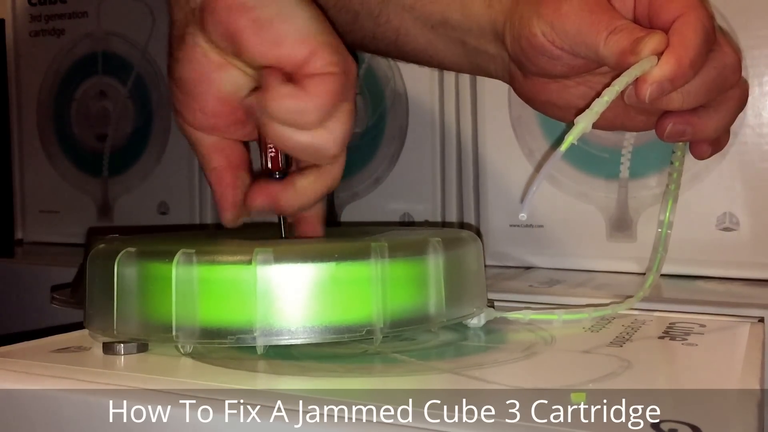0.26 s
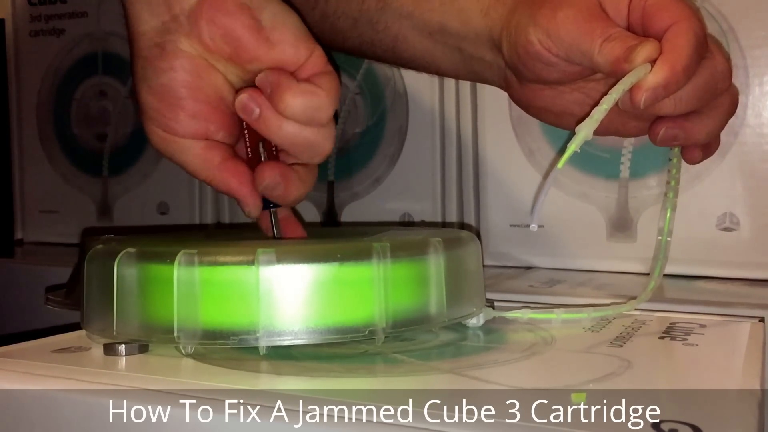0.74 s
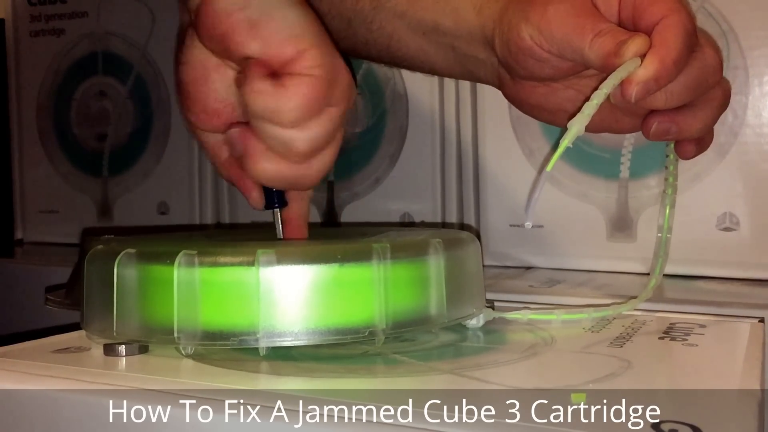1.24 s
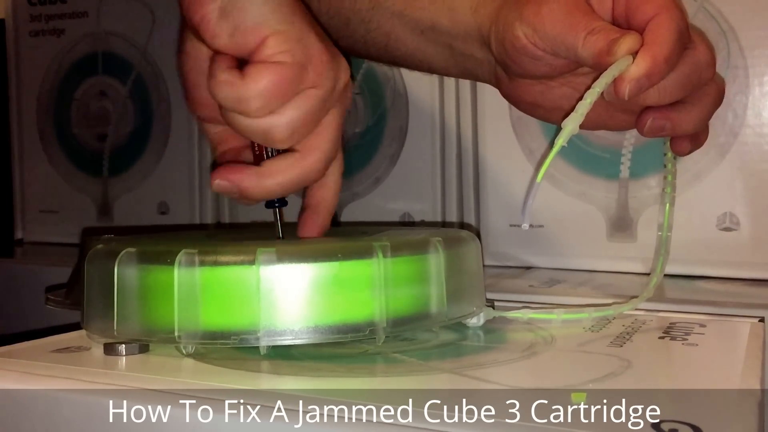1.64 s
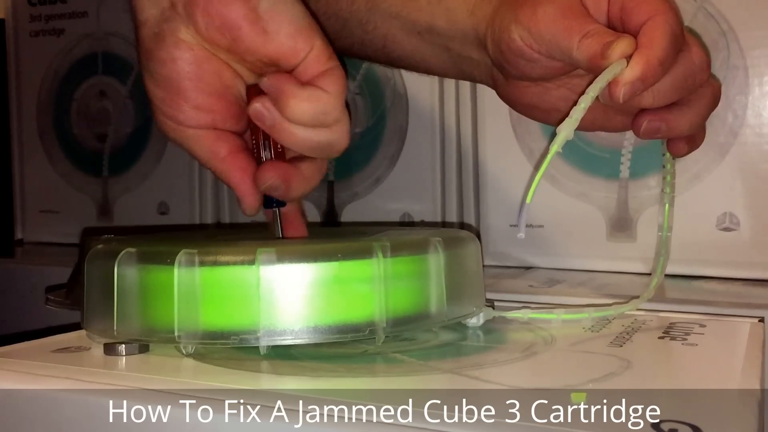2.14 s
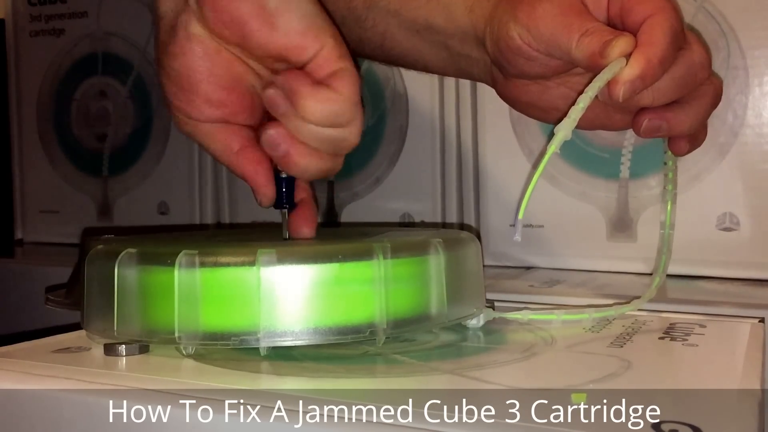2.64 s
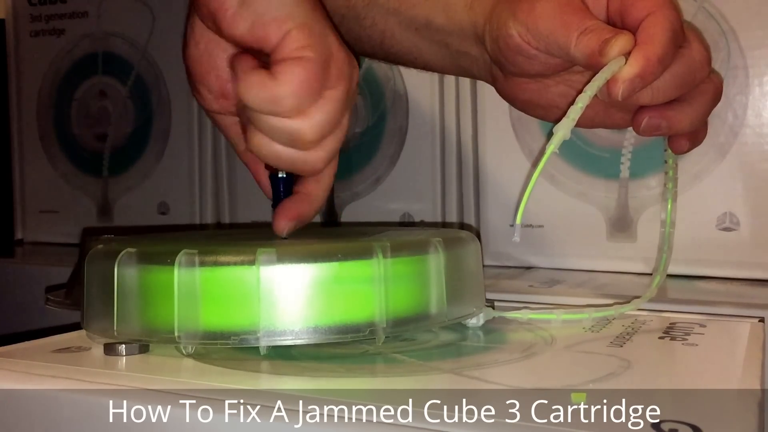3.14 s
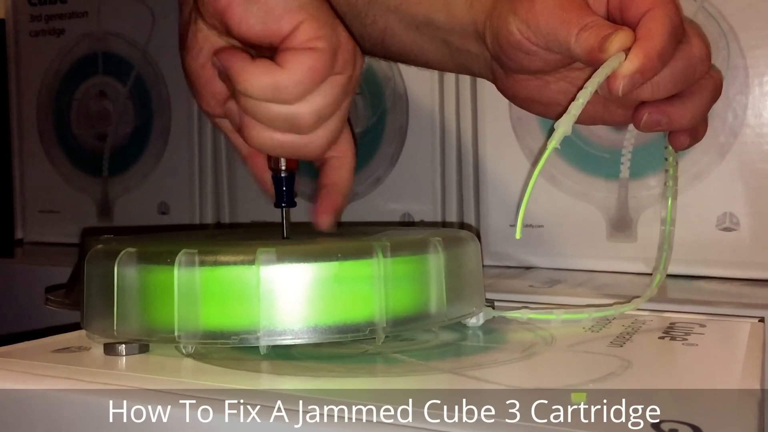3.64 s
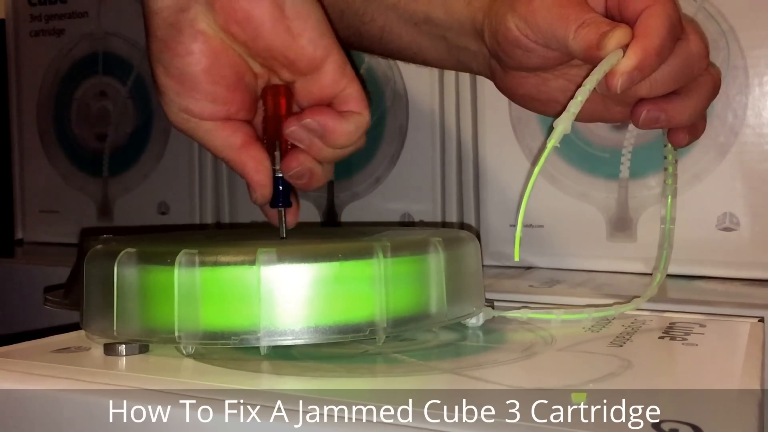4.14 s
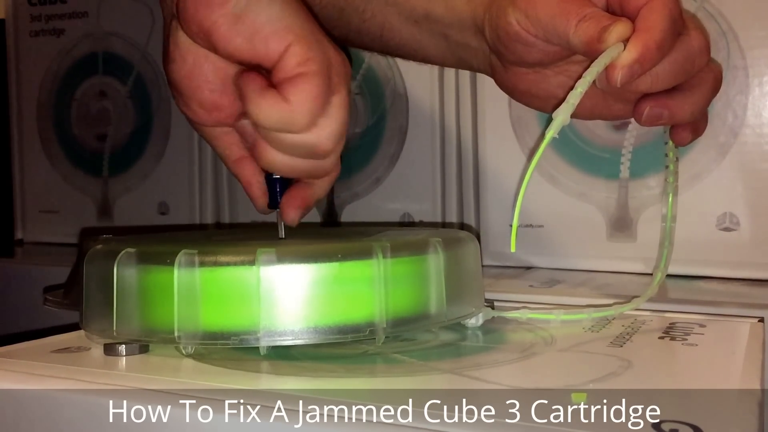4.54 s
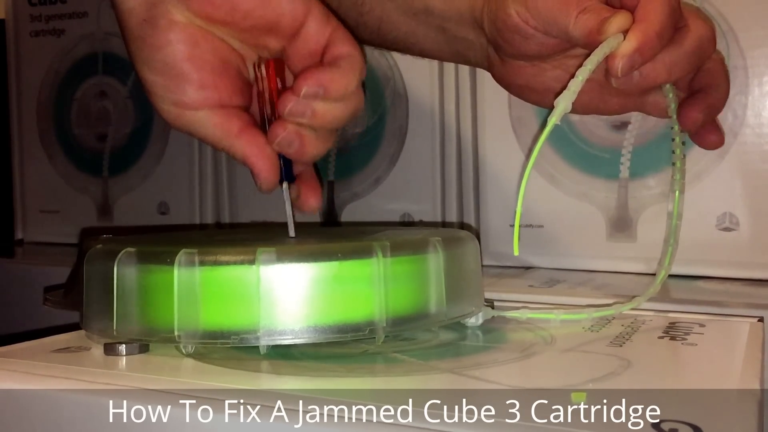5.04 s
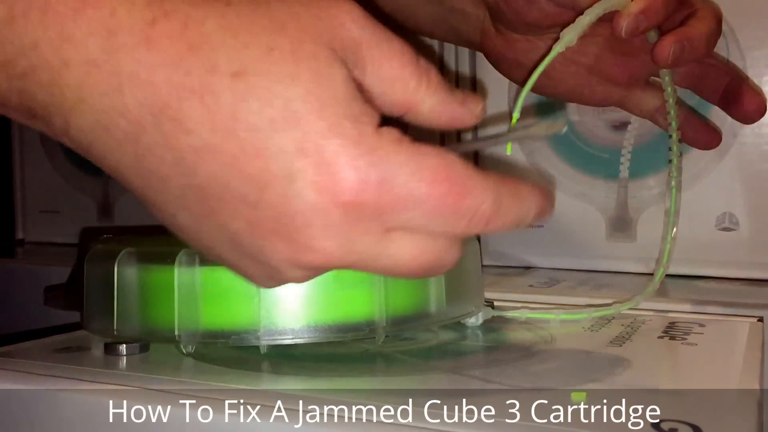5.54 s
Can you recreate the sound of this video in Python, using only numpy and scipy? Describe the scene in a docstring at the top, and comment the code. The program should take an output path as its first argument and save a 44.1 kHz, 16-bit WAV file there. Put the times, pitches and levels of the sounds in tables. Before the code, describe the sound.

Irregular plastic clicks and faint ratcheting scrapes in a quiet room, broken early by a sharp crack with a low thump.

```python
"""On a printer's bed in a small room, a small screwdriver turns the feed gear of a plastic filament cartridge by hand.
Each twist grinds and ticks the gear teeth: random slips and short blows excite decaying modes of the plastic.
Between twists the blade knocks in its socket. Once the gear slips with a loud snap that jolts the cartridge on the
bed; at the end the blade chatters out of the socket in squeaking slips. Room air and mains hum lie underneath."""
import sys
import numpy as np
from scipy import signal
from scipy.fft import rfft, irfft
from scipy.io import wavfile

SR = 44100
rng = np.random.default_rng(int(sys.argv[2]) if len(sys.argv) > 2 else 0)


def output_pcm(signal):
    """Save a mono or channel-first signal as 16-bit PCM at the path in sys.argv[1].

    Samples are clipped to [-1, 1] before scaling.
    """
    pcm = np.clip(np.atleast_2d(signal).T, -1, 1) * 32767
    wavfile.write(sys.argv[1], SR, np.round(pcm).astype(np.int16))


N = 255382
AGE = np.arange(6000) / SR  # time since a blow, s


def undb(db):
    """Decibels to gain."""
    return 10 ** (np.asarray(db) / 20)


def fade(t60, t=AGE):
    """Exponential decay by 60 dB in t60 seconds."""
    return np.exp(-np.log(1000) * t / t60)


def unit(x):
    """Scale a short sound to the energy of 10 ms at full level."""
    return x / np.sqrt(np.sum(x ** 2) / (SR / 100) + 1e-18)


def add(out, s, x):
    """Mix x into out from time s."""
    i = max(int(s * SR), 0)
    out[i:i + len(x)] += x[:len(out) - i]


def cut(x, hz, kind, order=3):
    """Butterworth filter."""
    return signal.sosfilt(signal.butter(order, hz, kind, fs=SR, output="sos"), x)


def along(hz, points):
    """Read (f/Hz, value) points on a log-frequency axis."""
    f, value = np.transpose(points)
    return np.interp(np.log(hz + 1e-9), np.log(f), value)


def response(points, size=2048):
    """Minimum-phase impulse response with the given spectrum, by folding its cepstrum."""
    gain = undb(along(np.fft.rfftfreq(size, 1 / SR), points))
    cepstrum = irfft(np.log(gain))
    cepstrum[1:size // 2] *= 2
    cepstrum[size // 2 + 1:] = 0
    return irfft(np.exp(rfft(cepstrum)))


def through(x, h):
    """Pass x through an impulse response."""
    return signal.fftconvolve(x, h)[:len(x)]


def burst(t60):
    """The dense, quickly dying vibration of a rough contact."""
    return rng.standard_normal(len(AGE)) * fade(t60)


def slips(per_s, spread_db):
    """Random impulses, mostly small and a few large."""
    size = undb(spread_db * np.minimum(rng.exponential(size=N), 2))
    happens = rng.random(N) < per_s / SR
    return happens * rng.choice([-1, 1], N) * size


# the hand damps the low modes, the plastic itself the high ones
LONGEST_RING_S, LONGEST_RING_CYCLES = 0.1, 75


def ring(modes, scatter_db, t=AGE):
    """Decaying modes; the place of contact sets the size and sign of each anew."""
    hz, db, t60 = np.transpose(modes)
    longest = np.minimum(LONGEST_RING_S, LONGEST_RING_CYCLES / hz)
    t60 = np.minimum(t60, longest)
    size = undb(db + scatter_db * rng.standard_normal(len(hz))) * rng.choice([-1, 1], len(hz))
    return size @ (np.sin(2 * np.pi * hz[:, None] * t) * fade(t60[:, None], t))


# spectrum of the room air: f/Hz, relative level/dB
AIR_COLOUR = [(25, -23), (45, -15), (80, -12), (120, -14), (200, -15), (300, -21), (600, -23), (1050, -25),
              (1500, -29), (4300, -34), (10000, -39), (15500, -42)]
# steady hum tones: f/Hz, RMS level/dB
HUM_TONES = [(59.3, -57.5), (194, -71.5)]
AIR_DB = -71  # RMS level of the air above 240 Hz


def background():
    """Quiet room air is shaped noise; the steady mains hum is a sum of sines."""
    air = through(rng.standard_normal(N), response(AIR_COLOUR, size=8192))
    air *= undb(AIR_DB) / np.std(cut(air, 240, "highpass"))
    t = np.arange(N) / SR
    hum = sum(undb(db) * np.sqrt(2) * np.sin(2 * np.pi * (hz * t + rng.random()))
              for hz, db in HUM_TONES)
    return air + hum


# decay of the room tail: f/Hz, t60/s
ROOM_DECAY = [(150, 0.84), (500, 0.67), (1800, 0.33), (4000, .32), (8000, 0.28), (15000, .19)]


def room(x):
    """Near printer walls return the sound at once; the room adds a short tail, dying first in the treble."""
    t = np.arange(SR * 3 // 4) / SR
    tail = np.zeros(len(t))
    edges = np.geomspace(80, 16000, 9)
    for lo, hi in zip(edges, edges[1:]):
        band = cut(rng.standard_normal(len(t)), [lo, hi], "bandpass")
        tail += band * fade(along(np.sqrt(lo * hi), ROOM_DECAY), t)
    tail *= 1 - fade(0.018, t)
    # sparse early echoes, none before 2 ms
    echoes = rng.standard_normal(len(t)) * (rng.random(len(t)) < 0.03)
    near = echoes * fade(0.06, t) * (t > 0.002)
    return x + through(x, undb(-42) * tail + undb(-9.5) * near / np.linalg.norm(near))


# modes of the bed: f/Hz, relative level/dB, t60/s
BED_MODES = [(85, -8, .14), (122, -1, .17), (146, -19, 1.75), (202, 1, .12)]
# the cartridge drops back on the bed: t/s, relative level/dB
BED_THUMPS = [(0.004, -21), (0.151, -14.5), (0.718, -13.5), (1.412, -3.5), (1.435, 3), (1.63, -21)]


def thumps():
    """The cartridge lands softly on the bed, which booms and then hums on in its slowest mode."""
    out, t = np.zeros(N), np.arange(2 * SR) / SR
    boom = sum(undb(db) * np.sin(2 * np.pi * hz * t) * fade(t60, t) for hz, db, t60 in BED_MODES)
    soft_boom = boom * (1 - fade(0.024, t))
    for s, db in BED_THUMPS:
        add(out, s, undb(db - 22.5) * soft_boom)
    return cut(out, 60, "highpass")


# modes of the blade scraping in the socket: f/Hz, relative level/dB, longest t60/s
BLADE_MODES = [(599, -12, 0.053), (759.6, -8.5, 0.031), (1770, -8, 0.025), (2017, -4, 0.011),
               (2203, 0, 0.017), (2568, -3, .03), (2920, -19, 0.014), (4670, -9.5, 0.013)]
# spectrum of the blade's contact crack: f/Hz, relative level/dB
BLADE_CRACK_COLOUR = [(2800, -4.5), (3350, -4), (3800, 0.5), (4700, -2), (7800, -2), (9600, 2), (10800, -8),
                      (15000, -15)]
# the blade slips in its socket, at last chattering out of it: t/s, relative level/dB
BLADE_SLIPS = [(2.294, -16), (2.315, -19.5), (5.086, -8), (5.0925, -5), (5.097, -3.5), (5.106, -7),
               (5.1126, -2.5), (5.125, -7), (5.1342, -5), (5.150, -13)]
SLIP_S, SQUEAK_HZ = 0.0053, 2540  # a slip's squeak before it dies; its mean pitch
SLIP_SQUEAK_DB, SLIP_CRACK_DB = -36.5, -46


def chatter():
    """The blade sticks and slips up the socket wall; each slip ticks, squeaks for a few milliseconds and rings."""
    out, crack = np.zeros(N), response(BLADE_CRACK_COLOUR)
    sliding = (1 - fade(0.008)) * fade(0.008, np.maximum(AGE - SLIP_S, 0))
    for s, db in BLADE_SLIPS:
        pitch_hz = SQUEAK_HZ * (1 + 0.028 * rng.standard_normal())
        squeak = sliding * np.sin(2 * np.pi * pitch_hz * AGE)
        scrape = through(burst(t60=0.037), ring(BLADE_MODES, scatter_db=0))
        tick = through(burst(t60=0.007) + undb(-14.5) * burst(t60=0.081), crack)
        add(out, s, undb(db + SLIP_SQUEAK_DB) * (unit(squeak) + unit(scrape)))
        add(out, s, undb(db + SLIP_CRACK_DB) * unit(tick))
    return out


# modes of the cartridge with its gear, also for grind and clicks: f/Hz, relative level/dB, longest t60/s
CARTRIDGE_MODES = [(127, -14, .12), (199.3, 1.5, 0.39), (236, -6, 0.11), (387, -3, 0.088), (484, -6, 0.1),
                   (606, 0.5, 0.059), (706, -4, 0.053), (805, -3, 0.043), (908, -6, .06),
                   (1036, -5.5, 0.051), (1297, -1.5, 0.081), (1388, -6, 0.12), (1708, -3, .05),
                   (1942, -1, .04), (2060, -7, .04), (2680, -3.5, 0.11), (2564, -3, .04), (2750, -9, 0.01),
                   (3095, -10, 0.027), (3600, -10.5, .04), (3900, -16, .04)]
# the slipping gear jumps its teeth: t/s, relative level/dB, level above 4 kHz/dB
TOOTH_JUMPS = [(1.4, -4.5, -24.5), (1.404, 0.5, 4), (1.4064, -6.5, -12), (1.4115, -2, -8.5),
               (1.4164, -8.5, -1), (1.4255, -3, -2.5), (1.4318, -6.5, -4), (1.4346, -6, -13.5)]
# spectrum of the noise in each blow: f/Hz, relative level/dB
JUMP_COLOUR = [(40, -33.5), (110, -8), (200, -15.5), (300, -8.5), (520, -9), (850, -6), (1100, -9),
               (1750, -1), (2600, -5), (3300, -10), (4000, -6.5), (7250, -15), (10000, -20), (15500, -24)]


def snap():
    """The wound-up gear lets go and hammers over several teeth, shaking the whole cartridge."""
    out, colour = np.zeros(N), response(JUMP_COLOUR)
    for s, db, treble_db in TOOTH_JUMPS:
        # only the higher modes ring here; the low boom of the snap comes from thumps()
        modes = cut(ring(CARTRIDGE_MODES, scatter_db=1), 520, "highpass")
        blow = unit(through(burst(t60=0.032), colour)) + undb(-4.5) * unit(modes)
        blow = cut(blow * (1 - fade(0.0016)), 70, "highpass")
        body = cut(blow, 4000, "lowpass", order=1)
        treble = cut(blow, 4000, "highpass", order=1)
        add(out, s, undb(db - 18.5) * (body + undb(treble_db) * treble))
    return out


def hold(t, start, end):
    """1 from start to end, with a short ramp on either side."""
    return np.clip(1 + np.minimum(t - start, end - t) / RAMP_S, 0, 1)


# twists of the hand: gear bites t/s, effort level/dB, length of the bite/s,
# light turning before/s, light turning after/s
HAND_TWISTS = [(0.22, -50, 0.036, 0.029, 0.037), (0.69, -46.5, 0.064, 0.1, 0.057),
               (1.27, -48, 0.073, 0.099, 0.045), (2.115, -50, 0.077, 0.22, 0.025),
               (2.745, -45, 0.045, 0.13, 0.062), (3.335, -44, 0.065, 0.07, 0.03),
               (3.985, -41, 0.069, 0.03, 0.13), (4.71, -45.5, 0.071, 0.02, 0.17)]
LIGHT_DB, RAMP_S = -8, 0.028  # effort around the bite; time the hand takes to change it


def effort(t):
    """How hard the hand turns: lightly at first, fully while the gear bites, then lightly again."""
    total = 0
    for s, db, length, before, after in HAND_TWISTS:
        bite = hold(t, s, s + length)
        light = undb(LIGHT_DB) * hold(t, s - before, s + length + after)
        total = total + undb(db) * np.maximum(bite, light)
    return total


def turning():
    """When each twist starts and stops."""
    return [(s - before, s + length + after) for s, _, length, before, after in HAND_TWISTS]


# spectrum of the rubbing tooth flanks: f/Hz, relative level/dB
RUB_COLOUR = [(60, -16.5), (115, 0), (160, -1), (205, 11.5), (310, -8), (400, -2.5), (750, -8.5),
              (1150, -25), (2000, -22), (2700, -14.5), (3400, -30), (6000, -45.5), (15000, -48.5)]


def grind():
    """Small slips of the tooth flanks rumble through the cartridge; coarser ones each wake a mode of the plastic."""
    rub = through(slips(per_s=130, spread_db=1), response(RUB_COLOUR))
    grains = sum(through(slips(per_s=35, spread_db=3.5), ring([mode], scatter_db=3))
                 for mode in CARTRIDGE_MODES)
    rubbing = undb(-3) * rub / np.std(rub) + undb(-8.5) * grains / np.std(grains)
    return effort(np.arange(N) / SR) * rubbing


# small teeth catch at uneven intervals during a twist; their level follows the effort
TICK_GAP_S, TICK_DB, TICK_SPREAD_DB, TICK_HARDNESS_DB = 0.028, 1.5, 3.5, -2
TICK_LOW_HZ, TICK_HIGH_HZ = 1100, 2800


def ticks():
    """The small clicks within the twists, in the columns of CLEAR_CLICKS."""
    rows = []
    for start, stop in turning():
        for k, (late, size, place) in enumerate(rng.random((24, 3))):
            s = start + (k + late) * TICK_GAP_S
            if s < stop:
                db = 20 * np.log10(effort(s)) + TICK_DB + TICK_SPREAD_DB * (2 * size - 1)
                centre_hz = TICK_LOW_HZ * (TICK_HIGH_HZ / TICK_LOW_HZ) ** place
                rows.append((s, db, TICK_HARDNESS_DB, centre_hz))
    return rows


# the clear clicks of gear and blade: t/s, relative level/dB, hardness of the contact/dB, centre of the ring f/Hz
CLEAR_CLICKS = [(0.1424, -16.5, 3, 1120), (0.155, -31, -16.5, 980), (0.2236, -41, -2, 1090),
                (0.2396, -35, 5.5, 2970), (0.352, -33, -5, 1560), (0.5416, -45.5, 7, 2460),
                (0.6902, -40.5, -2.5, 1510), (0.7132, -34, -0.5, 1380), (0.719, -30.5, 0.5, 1600),
                (0.7536, -44.5, 3, 2580), (1.1533, -38, 5.5, 1760), (1.1884, -40, 5.5, 2730),
                (1.22, -42.5, -6.5, 1760), (1.278, -42, -10, 980), (1.293, -37.5, -7.5, 1370),
                (1.591, -41.5, -5, 1557), (1.6273, -39.5, -9.5, 1900), (1.8898, -49.5, -10, 2500),
                (1.9587, -46.5, 1.5, 2460), (2.1044, -40, -4.5, 2052), (2.145, -36.5, 0, 2550),
                (2.2102, -38.5, -1.5, 1300), (2.3539, -25.5, -2.5, 1900), (2.36, -26.5, -2.5, 950),
                (2.6211, -44, -4, 2500), (2.6666, -40.5, -7, 1605), (2.7877, -34, 6, 2550),
                (2.8537, -37, 0, 2560), (3.0117, -51.5, 4.5, 2050), (3.1027, -46, 8.5, 2550),
                (3.236, -39.5, -7.5, 1407), (3.3103, -33.5, 0, 2539), (3.3575, -33, 2, 3050),
                (3.3674, -36, -4.5, 1948), (3.3771, -32.5, 0.5, 947), (3.3884, -36.5, 2, 950),
                (3.5329, -44, 4, 1710), (3.5384, -39.5, 0, 1806), (3.5917, -41.5, -2, 1280),
                (3.6062, -32.5, -6, 1000), (3.761, -29.5, -4.5, 1643), (3.9563, -36.5, 4.5, 2728),
                (3.9658, -34, 1, 1900), (3.9964, -40, -3, 968), (4.0092, -36.5, 1, 1996),
                (4.032, -41, 6, 2000), (4.0461, -36, 6.5, 2000), (4.0595, -40, -5, 2100),
                (4.093, -41.5, -1.5, 1270), (4.2044, -29, 3, 1946), (4.3105, -34, -0.5, 1800),
                (4.6918, -33, -1, 1296), (4.7128, -35, 4, 2010), (4.7269, -36, -3, 2066),
                (4.7554, -32, -0.5, 2050), (4.9735, -38.5, -4, 1256)]
# spectrum of the rough contact: f/Hz, relative level/dB
CRACK_COLOUR = [(200, 7.5), (1000, 3.5), (2700, 7.5), (3500, -3.5), (5000, -13), (8000, -19),
                (10500, -24.5), (14000, -23)]
# shell knock and contact crack against the click level; a harder contact trades knock for crack
KNOCK_DB, CRACK_DB = -16.5, -25.5
LOADED_KNOCK_DB = 6  # during a twist the gear presses on the shell, which then knocks harder
DRAG_T60_S, DRAG_DB = 0.035, -34.5  # the tooth drags before it lets go


def clicks():
    """A tooth drags and lets go: a contact crack, the short ring of the gear and a lower knock of the shell."""
    out, crack = np.zeros(N), response(CRACK_COLOUR)
    # the vibration needs a moment to spread through the plastic
    build_up = 1 - fade(0.004)
    for s, db, hardness_db, centre_hz in CLEAR_CLICKS + ticks():
        modes = unit(ring(CARTRIDGE_MODES, scatter_db=0))
        gear = build_up * (modes + undb(2) * unit(through(burst(t60=0.027), crack)))
        # the stiffness of the contact favours the modes near one frequency
        contact = response([(centre_hz / 1.6, -7), (centre_hz / 1.15, 0),
                            (centre_hz * 1.12, 0), (centre_hz * 1.3, -10)])
        gear = cut(through(gear, contact), [800, 3100], "bandpass", order=4)
        add(out, s, undb(db - 12) * unit(gear))

        shell = build_up * (modes + undb(-1.5) * unit(through(burst(t60=0.026), crack)))
        load = max(hold(s, start, stop) for start, stop in turning())
        knock_db = db + KNOCK_DB + load * LOADED_KNOCK_DB - hardness_db
        add(out, s, undb(knock_db) * unit(cut(shell, [100, 850], "bandpass")))

        tick = through(burst(t60=0.012) + undb(-12) * burst(t60=0.04), crack)
        add(out, s, undb(db + CRACK_DB + hardness_db) * unit(cut(tick, 3800, "highpass")))

        # the drag swells up to the moment of release
        drag = cut(through(burst(t60=DRAG_T60_S)[::-1], crack), [300, 3200], "bandpass")
        add(out, s - AGE[-1], undb(db + DRAG_DB) * unit(drag))
    return out


BLADE_ROOM_DB = -2.5  # the blade stands clear of the cartridge, so less of it comes by way of the room


def scene():
    """All the sounds of the cartridge in the room."""
    blade, share = chatter(), undb(BLADE_ROOM_DB)
    in_room = room(clicks() + snap() + grind() + share * blade)
    direct_blade = (1 - share) * blade
    return (in_room + direct_blade + thumps() + background())[None]


TOP_HZ = 15500


def record(dry):
    """A steep elliptic low-pass cuts the top of the treble."""
    return signal.sosfilt(signal.ellip(10, 0.2, 70, TOP_HZ, fs=SR, output="sos"), dry)


dry = scene()
out = record(dry)
output_pcm(out)
```